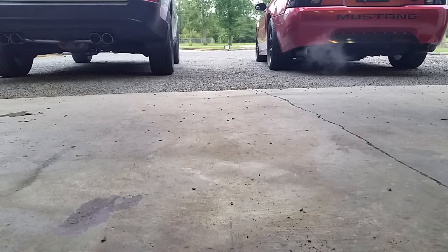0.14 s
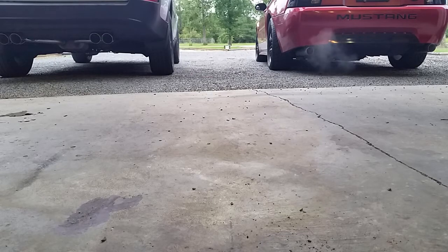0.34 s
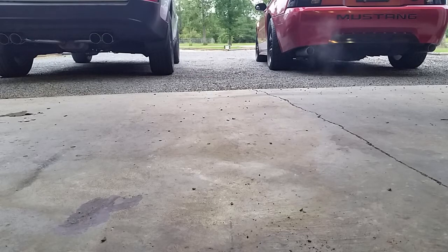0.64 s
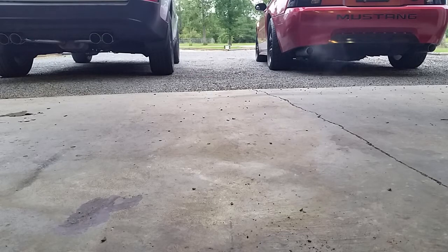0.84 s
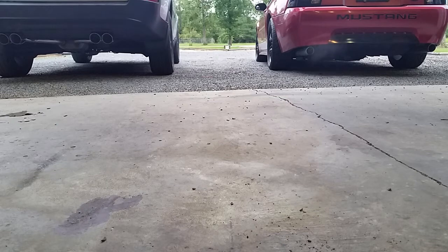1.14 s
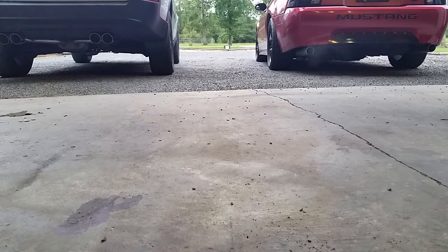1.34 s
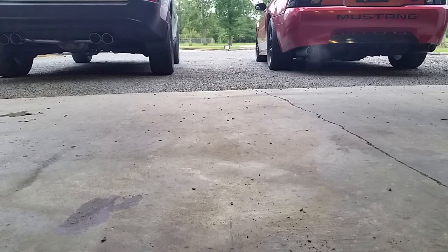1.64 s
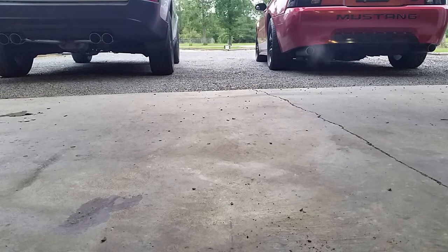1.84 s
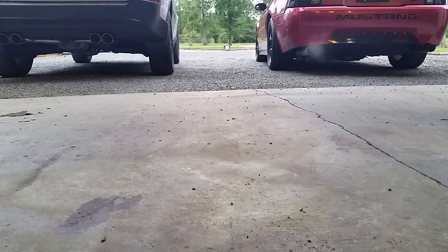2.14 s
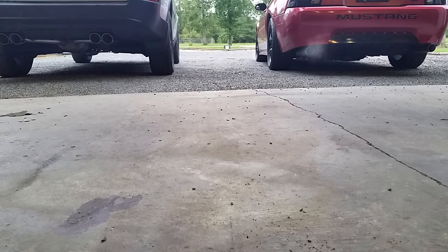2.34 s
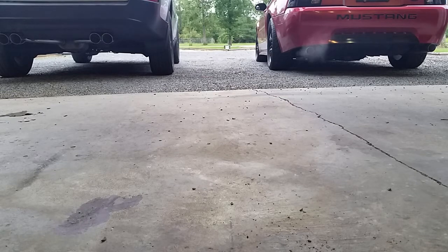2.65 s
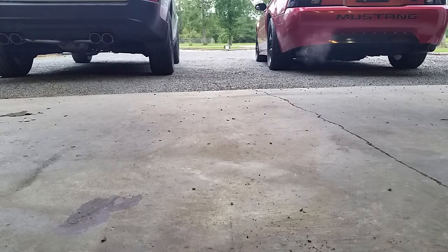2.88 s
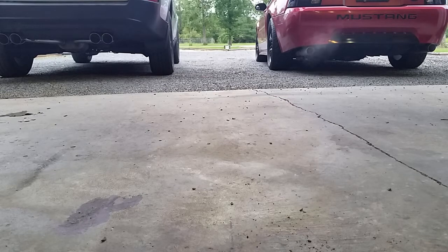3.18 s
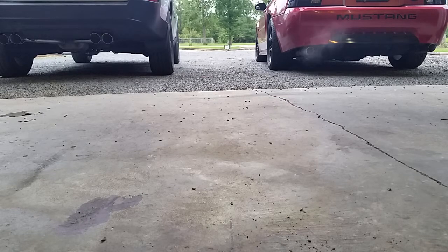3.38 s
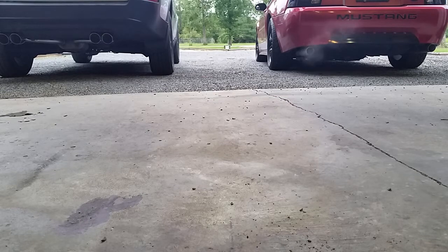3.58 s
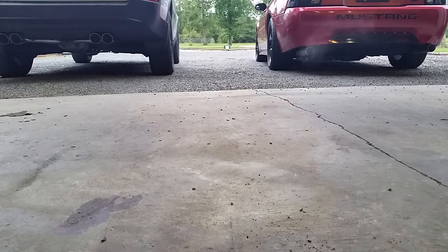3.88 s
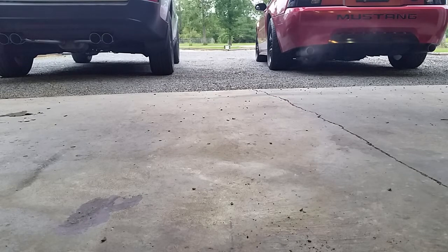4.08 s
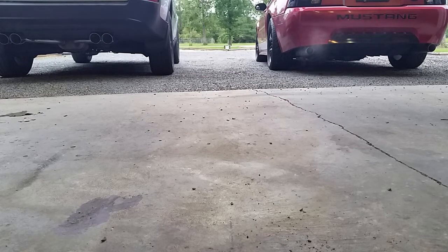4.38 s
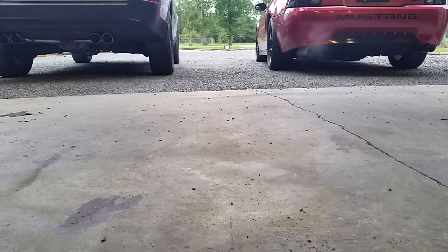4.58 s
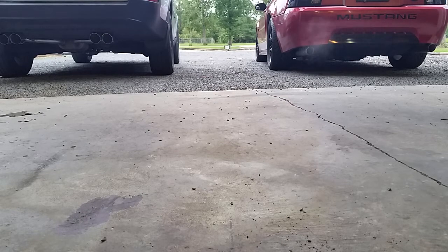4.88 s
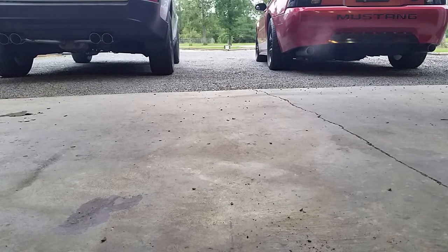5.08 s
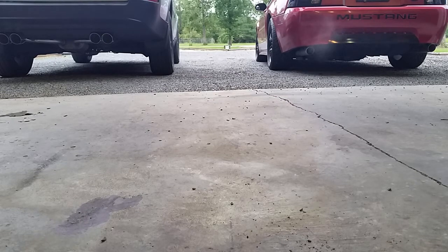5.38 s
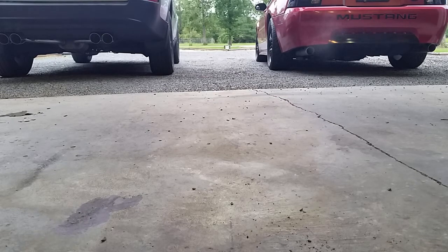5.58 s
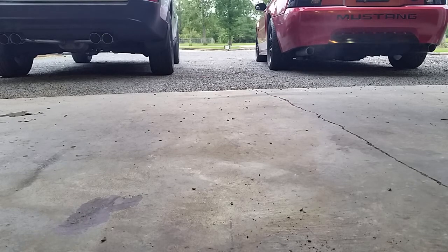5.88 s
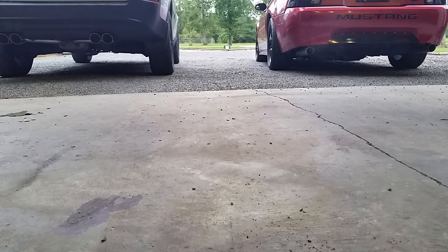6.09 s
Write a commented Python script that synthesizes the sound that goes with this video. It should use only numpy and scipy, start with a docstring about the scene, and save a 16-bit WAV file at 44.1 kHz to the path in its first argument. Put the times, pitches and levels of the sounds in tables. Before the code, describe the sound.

A six-cylinder car is already idling outside an open concrete garage, heard from the floor inside. From 0 s its exhaust beats rapidly and unevenly, about 48 firings a second, a deep lumpy burble with a brief low body shudder in the first third of a second. Over it lie a breathy gas roar, faint treble fizz, thin belt whine and humming sheet metal. The idle sags to its slowest near 1.5 s, then climbs gradually until about 4 s. Small short metallic rings tick between 0.8 and 3.9 s, and a soft spit of gas comes at 2.5 s. Just after 5 s the engine is cut: firings stop, dull slowing puffs thud, and a bright hiss with low rumble and rough gust swells, peaking near 5.3 s. By 5.5 s it collapses into hollow low notes and thin seeping air, fading with the faint yard wash to quiet after 6 s.

```python
"""A six-cylinder car idles just outside an open concrete garage, heard from the floor inside.
At first pulses from two unequal banks ring the pipes and the garage, over a brief shudder, filtered-noise
gas roar and fizz, whining tones, humming panels and a faint yard wash. The idle sags and recovers, with short
metal rings and one spit of gas. Then the fuel is cut: the firings stop, unfired strokes push dull puffs,
noise bursts out as hiss, rumble and gust, hollow notes and thin seeping air follow, and the garage goes quiet."""
import sys
import numpy as np
from scipy import signal
from scipy.fft import rfft, irfft, next_fast_len
from scipy.io import wavfile
from scipy.ndimage import uniform_filter1d, minimum_filter1d

SR = 44100
rng = np.random.default_rng(int(sys.argv[2]) if len(sys.argv) > 2 else 0)


def output_pcm(signal):
    """Save a mono or channel-first signal as 16-bit PCM at the path in sys.argv[1].

    Samples are clipped to [-1, 1] before scaling.
    """
    pcm = np.clip(np.atleast_2d(signal).T, -1, 1) * 32767
    wavfile.write(sys.argv[1], SR, np.round(pcm).astype(np.int16))


N = 274633
SIZE = next_fast_len(N + SR)  # room for ringing after the end
BINS = np.arange(SIZE // 2 + 1) * SR / SIZE + 1e-3  # frequency bins, Hz
OPPOSITE = np.array([[1], [-1]])  # plus in the left channel, minus in the right


def undb(db):
    """dB to gain."""
    return 10 ** (np.asarray(db) / 20)


def level(x, db):
    """Set the rms level."""
    return x * undb(db) / np.sqrt(np.mean(x ** 2))


def after(s):
    """Seconds gone since time s, 0 before it."""
    return np.maximum(np.arange(N) / SR - s, 0)


def over_time(table):
    """Columns of a curve table, one value per sample."""
    s, *columns = np.transpose(table)
    return [np.interp(np.arange(N) / SR, s, column) for column in columns]


def over_hz(points):
    """A frequency table, read at every frequency bin."""
    hz, value = np.transpose(points)
    return np.interp(np.log(BINS), np.log(hz), value)


def bell(hz, width, order):
    """Resonance curve on the frequency bins: 1 at its centre; a higher order falls off faster."""
    return 1 / (1 + ((BINS - hz) / (width / 2)) ** 2) ** order


def causal(gain):
    """Minimum-phase response with this gain: it rings after the pulse, never before."""
    cepstrum = irfft(np.log(gain + 1e-7), SIZE)
    cepstrum[1:SIZE // 2] *= 2
    cepstrum[SIZE // 2 + 1:] = 0
    return np.exp(rfft(cepstrum))


def shape(x, gain):
    """Filter by a gain on the frequency bins."""
    return irfft(rfft(x, SIZE) * gain, SIZE)[..., :N]


def walk(rate):
    """Random levels held for 1 / rate seconds and smoothed twice; spread near 1."""
    k = int(SR / rate)
    steps = np.repeat(rng.standard_normal(N // k + 1), k)
    return 1.2 * uniform_filter1d(uniform_filter1d(steps, k), k)[:N]


# how alike the two channels are: f/Hz, likeness (0-1)
CHANNEL_LIKENESS = [(60, 1), (130, 1), (290, 0.8), (640, 0.9), (1410, 0.2), (3100, 0.19), (6820, 0.3),
                    (15000, 0.03)]


def wide_noise(gain):
    """Noise of rms 1 whose two channels grow unlike towards the treble."""
    mid, side = rfft(rng.standard_normal((2, SIZE)))
    like = np.clip(over_hz(CHANNEL_LIKENESS), 0, 1)
    pair = np.sqrt(1 + like) * mid + np.sqrt(1 - like) * side * OPPOSITE
    return level(irfft(pair * gain, SIZE)[:, :N], 0)


# idle speed, sagging under load and recovering: t/s, firing rate f/Hz
IDLE_SPEED = [(0, 48.1), (.15, 46.57), (.37, 44.82), (.9, 42.31), (1.3, 40.84), (1.5, 38.58), (1.7, 39.02),
              (1.9, 39.6), (2.3, 39.18), (2.97, 41.81), (3.5, 43.28), (3.92, 44.68), (4.3, 44.48),
              (5.0, 44.75)]
MEAN_IDLE_HZ = 43
# the fuel is cut and the engine slows evenly from this firing rate
COAST_S, COAST_HZ, DRAG_HZ_PER_S = 5.012, 39.6, 37


def engine_speed():
    """Firing rate of the idle curve alone, and the rate with a steady slowing once the fuel is cut."""
    idle_hz = over_time(IDLE_SPEED)[0]
    coasting = after(COAST_S)
    slowing_hz = np.maximum(COAST_HZ - DRAG_HZ_PER_S * coasting, 0)
    return idle_hz, np.where(coasting > 0, slowing_hz, idle_hz)


# pipe and garage resonances: f/Hz, width/Hz, then relative level/dB for: all firings alike, one bank
# against the other, the bank with unequal branches, chance differences, unfired strokes
PIPE_MODES = [(50, 14.6, -6.5, -36, -45.5, -27.5, -7), (57.7, 8.7, -25.5, -27.5, -43.5, -30, -20.5),
              (73.8, 8.3, -10.5, -27, -41.5, -37.5, -20.5), (103, 16.4, -6, -7, -22, -26.5, 0),
              (135.44, 34, 0.5, -9.5, -4, -12.5, -5), (160.3, 26, -26, -3.5, -23, -22, -20),
              (174.7, 12, -11.5, -4, -18.5, -23, -20), (206.5, 8.4, -4, 2, 2.5, -10.5, -6.5),
              (209.1, 48, -17.5, -13.5, -23.5, -11, -17), (256.5, 13, -17, -14, 0, -17.5, -19.5),
              (274, 15, -17.5, -15.5, -13, -12.5, -24.5), (310.83, 16.1, -22.5, -1, -9, -8.5, -21),
              (447, 86, -33.5, -25.5, -30, -31.5, -33.5), (545, 24, -32.5, -31, -31.5, -31, -25)]


def resonances(order):
    """Gain through pipes and garage for one column of the mode table."""
    power = sum(undb(2 * row[order]) * bell(row[0], row[1], 1.88) for row in PIPE_MODES)
    power = power / (1 + (BINS / 345) ** 8)
    return np.sqrt(power) * np.minimum(BINS / 35, 1) ** 2


# colour of the upper exhaust: f/Hz, relative level/dB (per Hz)
EXHAUST_COLOUR = [(210, -33.5), (350, -11.5), (375, -13.5), (472, -22.5), (533, -9.5), (672, -18.5),
                  (749, -11), (1290, -26.5), (2100, -21), (3080, -38), (4560, -45), (6950, -42.5),
                  (9000, -57), (11700, -85.5), (19800, -120)]
# its resonances: f/Hz, width/Hz, level/dB over the colour
EXHAUST_PEAKS = [(414.4, 29, 14), (520, 2.9, 6.5), (606, 25, 8), (739.7, 8, 8), (862, 6.1, 6.5),
                 (934, 12, 11), (1140, 6.3, 6), (1770, 41, 3), (1990, 15, 5.5), (2150, 11, 8),
                 (2440, 25, 8.5), (2570, 32, 5), (3400, 170, 3), (4000, 320, 2), (4970, 90, 5),
                 (5530, 130, 4.5), (6940, 630, 7)]


def roar_gain():
    """Colour and resonances of the upper exhaust."""
    peaks_db = sum(db * bell(hz, width, 0.85) for hz, width, db in EXHAUST_PEAKS)
    return undb(over_hz(EXHAUST_COLOUR) + peaks_db) * np.minimum(BINS / 340, 1) ** 8


# what each cylinder, in firing order, sends down the unequal branches: strength (0-1), travel time/ms
CYLINDER_BRANCHES = [(0.86, 0.01), (0.09, 0.75), (.95, 2.68), (0.6, 0.02), (0.93, 1.1), (0.08, 3.7)]
PIPE_DB, BANK_DB, BRANCH_DB, UNEVEN_DB = -15, -20, -21, -22
RASP_DB, RASP_SCATTER_DB = -41.5, 9  # the edge of each firing rings the upper resonances
IGNITION_OFF_S = 5.07  # no firings after this
LEAD_FIRINGS = 12  # the engine is already running at the start
TIMING_MS = .06  # firings come a little early or late
CYCLE_SWAY, CYCLE_SWAY_TURN = 0.17, 0.2  # firings swell once per six: depth at mean idle, place in cycle (0-1)
LOPE_DB_PER_HZ, BRANCH_DB_PER_HZ = -0.76, -0.3  # banks and branches grow more unequal as the idle sags


def exhaust(hz, firings, load_db):
    """One pressure pulse per firing; the banks alternate, and unequal branches make some pulses late."""
    at = np.flatnonzero(np.diff(np.floor(firings[:int(IGNITION_OFF_S * SR)]))) + 1
    lead = at[0] - np.arange(LEAD_FIRINGS, 0, -1) * int(SR / hz[0])
    at = np.concatenate([lead, at])
    count = np.arange(len(at))
    at = at + np.round(TIMING_MS * SR / 1000 * rng.standard_normal(400)[count]).astype(int)
    speed_change = hz[np.minimum(abs(at), int(COAST_S * SR) - 1)] - MEAN_IDLE_HZ
    lope = (-1.) ** count * undb(LOPE_DB_PER_HZ * speed_change + 1.1 * walk(5)[abs(at)])
    strength, late_ms = np.transpose(CYLINDER_BRANCHES)[:, count % 6]
    late = at + np.round(late_ms * SR / 1000).astype(int)
    chance = rng.uniform(-1, 1, 400)[count]
    unequal = undb(BRANCH_DB_PER_HZ * speed_change)
    sway = 1 + CYCLE_SWAY * unequal * np.cos(2 * np.pi * (count / 6 + CYCLE_SWAY_TURN))
    parts = [(at, sway, PIPE_DB), (at, lope, BANK_DB),
             (late, strength * unequal, BRANCH_DB), (at, chance, UNEVEN_DB)]
    out = 0
    for column, (place, size, db) in enumerate(parts, start=2):
        pulses = np.zeros(SIZE)  # firings before the start wrap round and ring into it
        pulses[place] = size * undb(load_db[abs(at)])
        out = out + level(shape(pulses, causal(resonances(column))), db)
    edges = np.zeros(SIZE)
    edges[late] = (1 + strength) * undb(load_db[abs(at)] + RASP_SCATTER_DB * chance)
    rasp_gain = causal(roar_gain() / (1 + (BINS / 1100) ** 4))
    return out + level(shape(edges, rasp_gain), RASP_DB)


# side sound against mid sound in the garage: f/Hz, level/dB
SIDE_OVER_MID = [(48, -30.5), (66, -16), (85, -5.5), (105, -26.5), (140, -20.5), (200, -13), (380, -11.5),
                 (700, -5.5)]
# low pitches build up later in the garage: f/Hz, delay/ms
LATE_BASS = [(0, 45), (100, 45), (330, 0)]
GARAGE_T60_S = .3  # the side echo falls 60 dB in this time
GARAGE_SMEAR_MS = 24  # spread of the arrival times of neighbouring pitches
FADE_IN_S = .008


def garage(x):
    """Scattered echoes smear each pulse in time and reach the two channels differently."""
    knots_hz = np.arange(0, 1000, 18)
    delay_s = np.interp(BINS, knots_hz, rng.random(len(knots_hz)) - .5) * GARAGE_SMEAR_MS / 1000
    delay_s = delay_s + np.interp(BINS, *np.transpose(LATE_BASS)) / 1000
    notch = undb(-8.5 * bell(160.4, 13, 1))  # here direct sound and an echo cancel
    # adding up the delays over frequency gives the phase
    smear = np.exp(-2j * np.pi * np.cumsum(delay_s) * SR / SIZE) * notch
    x = x * np.sin(np.pi / 2 * np.minimum(after(0) / FADE_IN_S, 1)) ** 2
    t = np.arange(SR // 2) / SR
    echo = level(rng.standard_normal(len(t)) * undb(-60 * t / GARAGE_T60_S), 0) / np.sqrt(len(t))
    mid = shape(x, smear)
    side = shape(x, smear * rfft(echo, SIZE) * undb(over_hz(SIDE_OVER_MID)))
    return np.array([mid + side, mid - side])


CYCLE_THROB, BANK_THROB = 1.2, 0.76  # swing once per six firings and once per two, against 1 per firing


def throb(firings):
    """Gas puffs with every firing, more for one bank and most for one cylinder."""
    each = np.cos(2 * np.pi * firings)
    bank = BANK_THROB * np.cos(np.pi * firings)
    cycle = CYCLE_THROB * np.cos(2 * np.pi * firings / 6)
    return each + bank + cycle


# bands of the roar: edges f/Hz, base level/dB, dB gained per dB of gas noise level, slow flicker/dB,
# share of the throb (0-1)
GAS_BANDS = [((0, 480, 650, 850, 1200), -37, 0.61, 0.98, 0.02), ((1170, 1510, 1850, 2320, 2890),
             -44, .8, 0.46, 0.081), ((2900, 4700, 6200), -60, 1, 0.68, 0.025), ((6200, 20000),
             -58.5, 1.8, 1.8, 0.13)]


def roar(firings, gas_db, still_db):
    """Gas noise in pipe and body resonances, puffing a little with each firing; bands flicker apart."""
    beat = throb(firings)
    noise = wide_noise(roar_gain())
    out = 0
    for edges_hz, db, per_gas_db, flicker_db, puffing in GAS_BANDS:
        band = 0
        for low, high in zip(edges_hz, edges_hz[1:]):
            flicker = undb(flicker_db * walk(12) + 1.6 * walk(25))
            band = band + shape(noise, (BINS > low) & (BINS <= high)) * flicker
        out = out + level(band, db) * undb(per_gas_db * gas_db) * (1 + puffing * beat)
    return out * undb(still_db)


# colour of the fizz: f/Hz, relative level/dB (per Hz)
TAIL_PIPE_COLOUR = [(4710, -29.5), (8000, -4.5), (9160, -5.5), (9940, 1.5), (11900, 2.5), (13600, -12.5),
                    (15700, -14.5)]
FIZZ_DB = -65  # before level changes and flicker
FIZZ_PUFFING = .13  # depth (0-1)


def fizz(firings, change_db):
    """Faint wet fizz at the tail pipe: flickering treble noise that puffs with the firings."""
    noise = wide_noise(undb(over_hz(TAIL_PIPE_COLOUR)) * np.minimum(BINS / 8000, 1) ** 8)
    flicker_db = .7 * walk(3.2) + 1.3 * walk(40)
    return noise * undb(FIZZ_DB + change_db + flicker_db) * (1 + FIZZ_PUFFING * np.cos(2 * np.pi * firings))


# belt-driven parts sing where a body resonance lifts them: multiple of the firing rate,
# base level/dB, body f/Hz, width/Hz
BELT_WHINES = [(30.3, -51, 1375, 97), (27.23, -54.5, 1300, 60)]
WHINE_WAVER_DB = 3.5


def whine(firings, load_db):
    """Thin wavering tones that follow the engine speed."""
    out = 0
    for multiple, db, hz, width in BELT_WHINES:
        gain = undb(db + load_db + WHINE_WAVER_DB * walk(6.0))
        tone = np.sin(2 * np.pi * multiple * firings + 2 * walk(25))
        out = out + shape(gain * tone, bell(hz, width, 0.99))
    return out


SHUDDER_DB, SHUDDER_HOLD_S, SHUDDER_DB_PER_S = -22, .3, 90  # level, how long it holds, then how fast it falls
SHUDDER_SIDE_DB = -4  # side against mid


def shudder():
    """The car body shakes for a moment before the idle is even: low noise, unlike in the two channels."""
    gain = np.sqrt(bell(62, 8.9, 0.9)) / (1 + (BINS / 250) ** 4)
    mid, side = level(shape(rng.standard_normal((2, SIZE)), gain), 0)
    side = undb(SHUDDER_SIDE_DB) * shape(side, np.minimum(BINS / 55, 1) ** 4)
    return (mid + side * OPPOSITE) * undb(SHUDDER_DB - SHUDDER_DB_PER_S * after(SHUDDER_HOLD_S))


# loose sheet metal that hums along: f/Hz, width/Hz
LOOSE_PANELS = [(527, 17), (1715, 70), (2575, 70)]
# how strongly each panel hums, before waver and puffing: t/s, then level/dB for each of the three panels
PANEL_LEVELS = [(0, -50.5, -60, -73.5), (.4, -41.5, -62, -72), (.65, -41, -54, -63.5),
                (.95, -45.5, -52.5, -60.5), (1.251, -49, -57, -60), (1.6, -49, -63, -62.5),
                (1.8, -51, -57.5, -59), (2.1, -39, -67, -57), (2.35, -53.5, -52, -56.5),
                (2.65, -40.5, -55.5, -62), (2.95, -45.5, -56, -65.5), (3.301, -52, -61, -69),
                (4.3, -48, -64, -70.5), (4.6, -46, -62.5, -72), (4.8, -47, -65, -59.5),
                (5.2, -45, -66, -69)]
PANEL_PUFFING = 0.12  # share of the throb


def panels(firings, still_db):
    """Gas noise shakes each panel at its own pitch, pulsing with the firings."""
    hum = 0
    for (hz, width), db in zip(LOOSE_PANELS, over_time(PANEL_LEVELS)):
        hum = hum + wide_noise(bell(hz, width, 1)) * undb(db + 3.2 * walk(14))
    return hum * (1 + PANEL_PUFFING * throb(firings)) * undb(still_db)


# colour of the yard: f/Hz, relative level/dB (per Hz)
OUTDOOR_COLOUR = [(180, -32), (300, -4.5), (460, -8.5), (666, -5.5), (746, -12), (1360, -18), (1540, -11),
                  (4610, -33.5), (9000, -31.5), (11700, -54), (19800, -120)]
YARD_DB, YARD_FADE_S, YARD_DB_PER_S = -55.5, 5.68, 9  # mean level, start of the fade, how fast it falls


def yard():
    """Faint outdoor wash: gently wavering noise that runs all through and dies away at the end."""
    fall_db = YARD_DB_PER_S * after(YARD_FADE_S)
    return wide_noise(undb(over_hz(OUTDOOR_COLOUR))) * undb(YARD_DB - fall_db + walk(7.2))


# brief rings of sheet metal under the car: t/s, level/dB before the soft rise, f/Hz
METAL_RINGS = [(0.792, -38.5, 1716), (0.885, -35, 1720), (1.025, -32, 1680), (1.178, -37, 1706),
               (1.323, -25, 940), (1.365, -37.5, 2053), (1.472, -33, 2166), (1.526, -35.5, 1990),
               (1.604, -27.5, 748), (1.638, -38, 2070), (1.78, -38, 1716), (1.985, -35, 2162),
               (2.177, -45, 2126), (2.291, -34, 1760), (2.3, -35, 2050), (2.45, -35, 1727),
               (2.48, -36, 2110), (2.745, -34, 1720), (2.392, -43.5, 1710), (2.676, -35, 2080),
               (2.791, -29, 598), (2.815, -31, 759.7), (3.127, -34, 511), (3.168, -38, 1750),
               (3.32, -34, 2005), (3.858, -32.5, 1998)]
RING_T60_S, RING_RISE_S = 0.1, 0.0077  # time to fall 60 dB; time constant of the rise


def rings():
    """Each ring is one quickly fading mode."""
    t = np.arange(SR // 5) / SR
    out = np.zeros(N)
    for s, db, hz in METAL_RINGS:
        k = int(s * SR)
        envelope = undb(db - 60 * t / RING_T60_S) * (1 - np.exp(-t / RING_RISE_S))
        out[k:k + len(t)] += envelope * np.sin(2 * np.pi * hz * t)
    return out


SPIT_S, SPIT_SPREAD_S, SPIT_DB = 2.545, .028, -57  # middle, half-width of the bell-shaped swell, peak level


def spit():
    """One brief brighter puff of gas from the tail pipe: a swell of noise around one pitch."""
    swell = np.exp(-.5 * ((np.arange(N) / SR - SPIT_S) / SPIT_SPREAD_S) ** 2)
    return wide_noise(np.sqrt(bell(3900, 700, 2.2))) * undb(SPIT_DB) * swell


# left-right balance of the escaping air: f/Hz, left minus right level/dB
AIR_BALANCE = [(3000, 0), (5000, -1.5), (7000, 3.5), (9000, -5.5), (12000, -3.5), (15000, 15)]


def pan_air(air):
    """Tip each pitch of the escaping air towards the left or the right."""
    return shape(air, undb(over_hz(AIR_BALANCE) / 2 * OPPOSITE))


# escaping air, before its puffs and dip: t/s, level/dB
AIR_LEVEL = [(5.012, -48), (5.04, -47), (5.065, -38.5), (5.16, -34.5), (5.27, -30.5), (5.35, -31.5),
             (5.46, -42.5), (5.54, -50), (5.66, -55.5), (5.9, -73), (6.23, -88)]
# its colour: f/Hz, relative level/dB (per Hz)
AIR_COLOUR = [(240, -32), (400, -3), (474, -19), (519, 10.5), (615, -5), (685, -5), (917, -6), (1200, -6),
              (3540, -17.5), (7500, -18), (10500, -8.5), (13000, -17), (15700, -14)]
HISS_BEAT = .24  # depth of the puffs (0-1)
HISS_SPLIT_HZ = 5000  # the jet puffs above this, the whoosh below flows evenly
WHOOSH_S, WHOOSH_SPREAD_S, WHOOSH_DIP_DB = 5.29, 0.14, -2.5  # the lower part dips a little around this time


def hiss(firings):
    """Air rushes out: a bright jet puffing with the last piston strokes over a smoother, lower whoosh."""
    t = np.arange(N) / SR
    pumping = np.clip((5.6 - t) / .2, 0, 1)  # the puffs even out as the pistons stop
    beat = 1 + pumping * HISS_BEAT * np.cos(2 * np.pi * firings)
    dip = undb(WHOOSH_DIP_DB * np.exp(-.5 * ((t - WHOOSH_S) / WHOOSH_SPREAD_S) ** 2))
    air = pan_air(wide_noise(undb(over_hz(AIR_COLOUR)) * np.minimum(BINS / 400, 1) ** 4))
    whoosh = shape(air, 1 / (1 + (BINS / HISS_SPLIT_HZ) ** 4))
    jet = air - whoosh
    return (whoosh * dip + jet * beat) * (after(COAST_S) > 0) * undb(over_time(AIR_LEVEL)[0])


# strokes of the dying engine: t/s, peak level/dB going into the garage
UNFIRED_STROKES = [(5.047, -6), (5.085, -14), (5.13, -15.5), (5.171, -8), (5.217, -14.5), (5.256, -14.5),
                   (5.278, -16), (5.307, -15), (5.347, -19.5), (5.391, -30), (5.439, -18), (5.478, -27.5),
                   (5.541, -37), (5.589, -31)]


def strokes():
    """Unfired pistons still push dull puffs into the pipes."""
    s, db = np.transpose(UNFIRED_STROKES)
    gain = causal(resonances(order=6))
    pulses = np.zeros(N)
    pulses[(s * SR).astype(int)] = undb(db)
    return shape(pulses, gain) / np.max(np.abs(irfft(gain, SIZE)))


# low rumble that lingers in the garage: t/s, murmur level/dB, deepest hum level/dB
RUMBLE_LEVELS = [(5.05, -23, -25.5), (5.128, -20.5, -30), (5.212, -18.5, -27), (5.258, -28, -30),
                 (5.3, -19, -26), (5.35, -18, -31), (5.406, -25, -27), (5.46, -24, -26.5),
                 (5.524, -38.5, -43), (5.6, -33, -45), (5.7, -40, -42.5), (5.82, -44.5, -45.5),
                 (5.92, -47, -47), (6.23, -49.5, -56)]
# colour of the murmur: f/Hz, relative level/dB (per Hz)
MURMUR_COLOUR = [(18, -38), (30, -6.5), (75, -12), (92, -15), (113, 0.5), (140, -3.5), (167, -12.5),
                 (301, -15.5), (368, -39.5), (409, -22.5), (455, -49), (500, -46.5), (650, -53),
                 (1100, -120)]


def rumble():
    """A loose low murmur in pipes and garage as the engine dies, lingering after the last strokes."""
    rise = np.clip((np.arange(N) / SR - RUMBLE_LEVELS[0][0]) / 0.057, 0, 1)
    murmur_db, hum_db = over_time(RUMBLE_LEVELS)
    murmur = wide_noise(undb(over_hz(MURMUR_COLOUR)) * np.minimum(BINS / 70, 1) ** 3)
    hum = wide_noise(bell(47, 14, 0.87))
    return (murmur * undb(murmur_db) + hum * undb(hum_db)) * rise


# the burst also blows through the pipes as a rough gust: t/s, level/dB before flicker
GUST_LEVEL = [(5.15, -59), (5.2, -38), (5.25, -35.5), (5.295, -40), (5.33, -35), (5.37, -38.5),
              (5.43, -47.5), (5.5, -58)]
GUST_FLICKER_DB = 0.5


def gust():
    """Rough mid-pitched body of the burst: noise in one broad resonance."""
    on = (after(GUST_LEVEL[0][0]) > 0) & (after(GUST_LEVEL[-1][0]) == 0)
    return wide_noise(bell(890, 600, 1.0)) * on * undb(over_time(GUST_LEVEL)[0] + GUST_FLICKER_DB * walk(40))


# short hollow notes of the pipes as the engine rocks to rest: middle t/s,
# peak level/dB going into the garage, f/Hz, length/s
PIPE_NOTES = [(5.449, -22.5, 48, .1), (5.491, -26, 128, .05), (5.565, -23, 125, .07),
              (5.619, -23.5, 108, 0.13), (5.727, -37.5, 118, .08), (5.742, -55, 780, .05),
              (5.832, -43, 140, 0.12), (6.03, -33.5, 135, .09), (6.096, -57, 660, 0.12),
              (6.163, -47, 285, 0.095), (6.168, -43.5, 142, 0.071)]


def moans():
    """Each note swells and fades on one pitch."""
    t = np.arange(N) / SR
    out = 0
    for s, db, hz, length_s in PIPE_NOTES:
        swell = np.cos(np.pi * np.clip((t - s) / length_s, -.5, .5)) ** 2
        out = out + undb(db) * swell * np.sin(2 * np.pi * hz * t)
    return out


# the last air seeps out thinner and higher, in small spurts: t/s, level/dB before flicker
SEEP_LEVEL = [(5.5, -60), (5.6, -64), (5.655, -59.5), (5.73, -65), (5.87, -67.5), (5.94, -71),
              (6.03, -70.5), (6.1, -74), (6.23, -79)]
# its colour: f/Hz, relative level/dB (per Hz)
THIN_AIR_COLOUR = [(2350, -47), (4000, -19), (4560, -20), (6040, -26), (7380, -9), (7640, -7), (9270, -15),
                   (10100, -7), (11900, -3), (15700, -19)]


def seep():
    """Thin spitting end of the escaping air: flickering treble noise."""
    air = pan_air(wide_noise(undb(over_hz(THIN_AIR_COLOUR)) * np.minimum(BINS / 4000, 1) ** 4))
    rise = np.minimum(after(SEEP_LEVEL[0][0] - .05) / 0.13, 1)
    return air * rise * undb(over_time(SEEP_LEVEL)[0] + 1.2 * walk(30))


# gas noise level: dips early, is louder through the middle, then slowly softens: t/s, level/dB
GAS_NOISE_LEVEL = [(0, -2.5), (.45, -6.5), (.6, -0.5), (1.4, -1), (2.7, -1), (3.6, -2.5), (4.2, -4),
                   (5, -5.5)]
LOAD_DB_PER_HZ, DYING_DB_PER_S = -0.16, 32  # firings harden as the idle sags, and weaken once the fuel is cut
STILL_S, STILL_DB_PER_S = 5.25, 38.5  # from here the gas stops moving and its noise dies
FIZZ_PER_GAS_DB = .5  # dB per dB of gas noise level


def scene():
    """Engine, air and rumble: one shared engine speed drives every part that beats or whines."""
    idle_hz, hz = engine_speed()
    gas_db = over_time(GAS_NOISE_LEVEL)[0]
    firings = np.cumsum(hz) / SR  # running count, with fractions
    load_db = LOAD_DB_PER_HZ * (idle_hz - MEAN_IDLE_HZ) - DYING_DB_PER_S * after(COAST_S)
    still_db = -STILL_DB_PER_S * after(STILL_S)
    pipes = garage(exhaust(hz, firings, load_db) + strokes() + moans())
    gas = roar(firings, gas_db, still_db) + fizz(firings, FIZZ_PER_GAS_DB * gas_db + still_db)
    body = whine(firings, load_db) + shudder() + panels(firings, still_db) + rings()
    escaping = hiss(firings - firings[int(COAST_S * SR)]) + gust() + seep()
    return pipes + gas + body + yard() + spit() + escaping + rumble()


# unlike colour of the two microphone ports: f/Hz, left minus right level/dB
PORT_COLOUR = [(60, 4.5), (110, -2), (200, -3), (380, 0.5), (700, 0.5), (1290, 1.5), (2380, 3.5),
               (4400, 11), (8120, 8), (15000, -22)]
LEFT_LAG = 4  # samples
LIMIT, LIMIT_MS = .66, 30  # level where the limiter starts (0-1), its window
TOP_HZ = 15780


def record(dry):
    """Two ports of unlike colour, the left a little further from the car; limited peaks; top cut."""
    tilt = undb(over_hz(PORT_COLOUR) / 2)
    lag = np.exp(-2j * np.pi * BINS * LEFT_LAG / SR)
    faded = dry * np.minimum(after(0) / FADE_IN_S, 1)
    ports = shape(faded, np.array([tilt * lag, 1 / tilt]))
    k = int(LIMIT_MS * SR / 1000)
    peak = uniform_filter1d(-minimum_filter1d(-np.abs(ports).max(axis=0), k), k)
    ports = ports * np.minimum(LIMIT / (peak + 1e-9), 1) ** .75  # takes off three quarters of the excess in dB
    return signal.sosfilt(signal.ellip(12, .2, 60, TOP_HZ, fs=SR, output="sos"), ports)


dry = scene()
out = record(dry)
output_pcm(out)
```